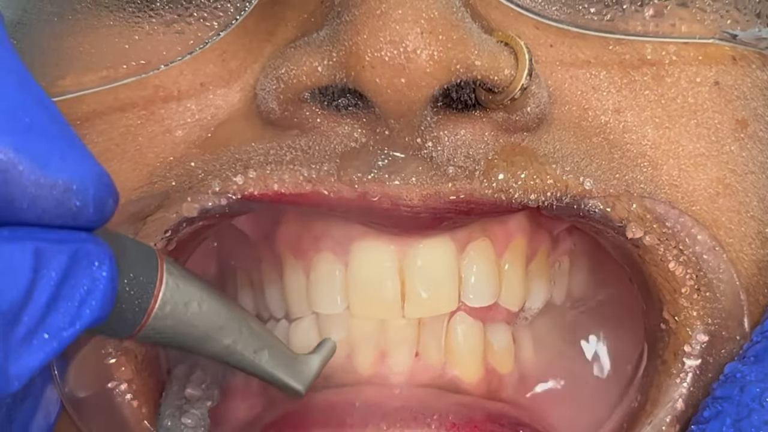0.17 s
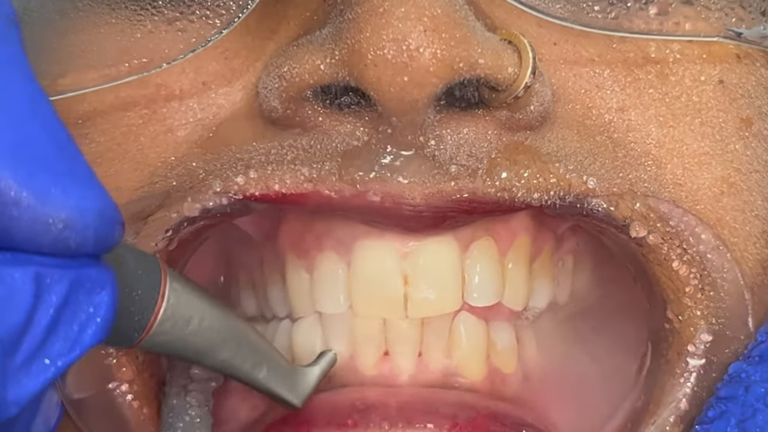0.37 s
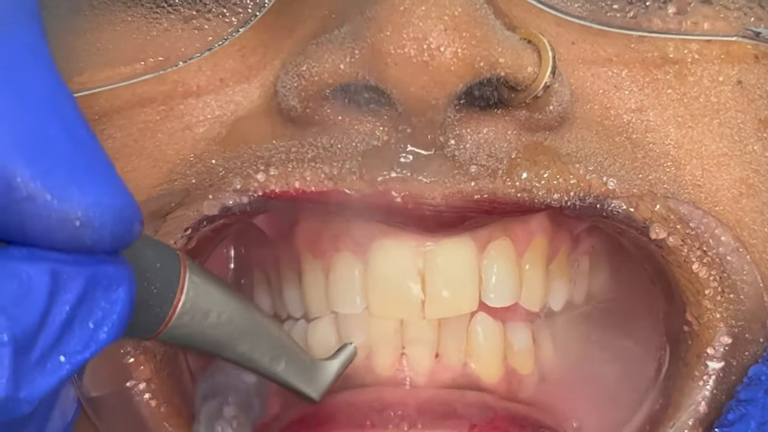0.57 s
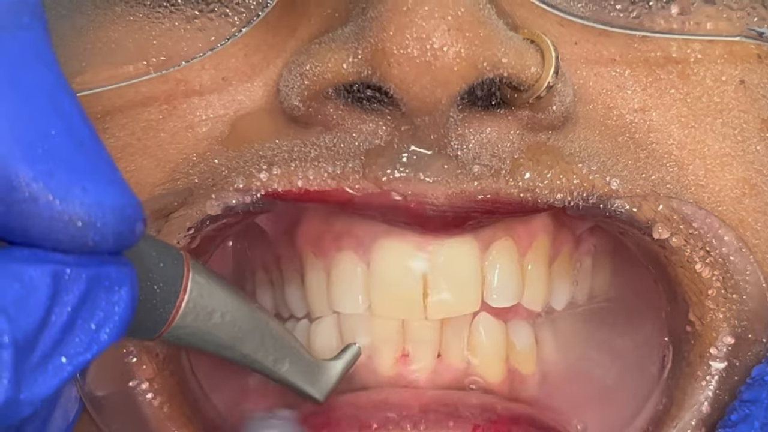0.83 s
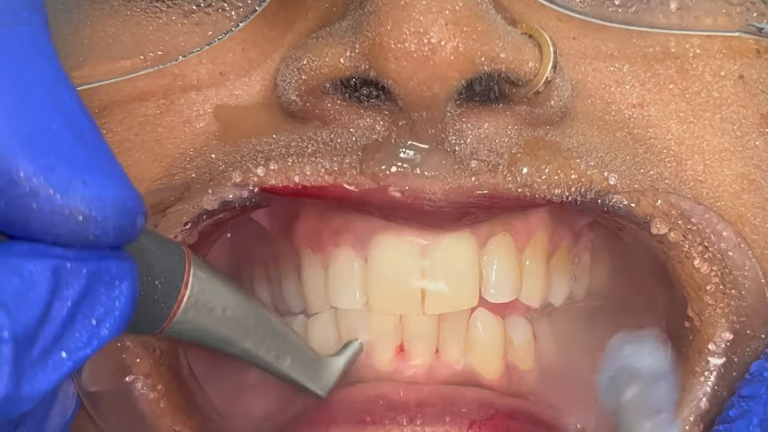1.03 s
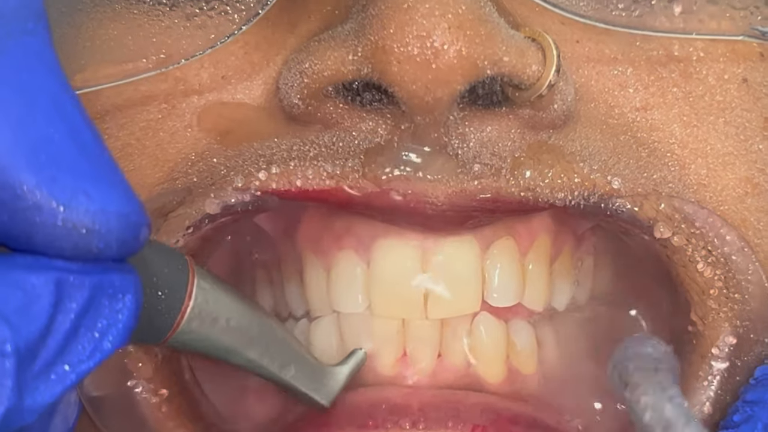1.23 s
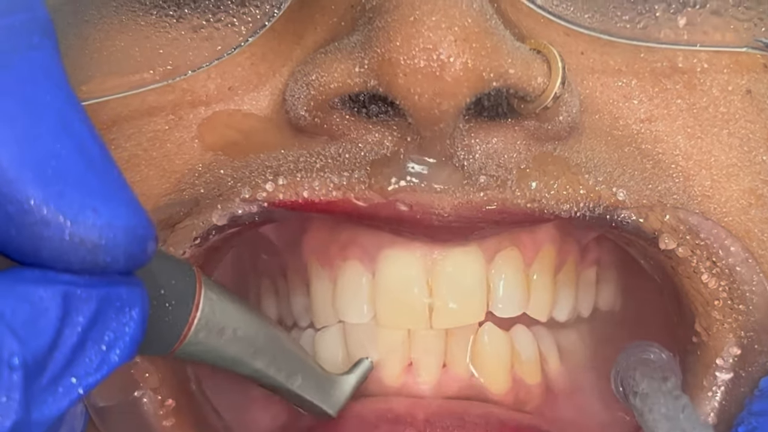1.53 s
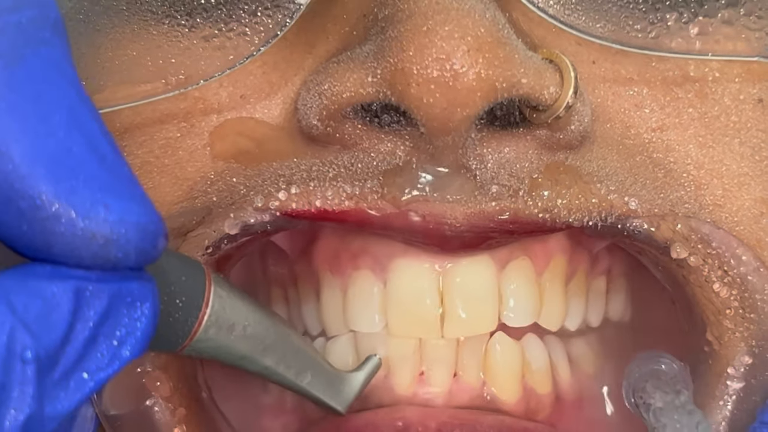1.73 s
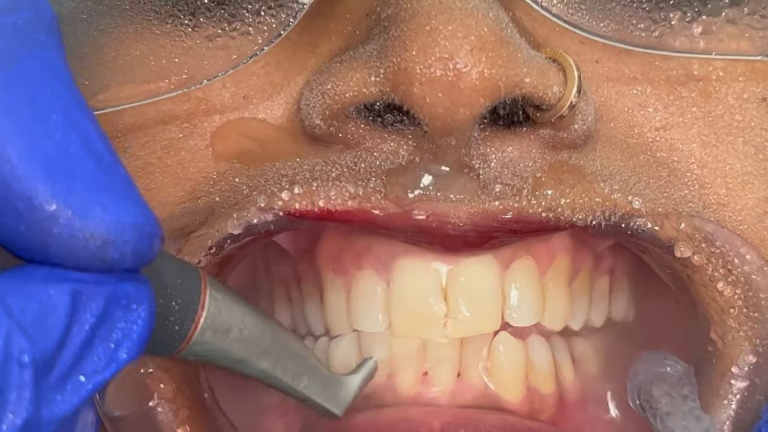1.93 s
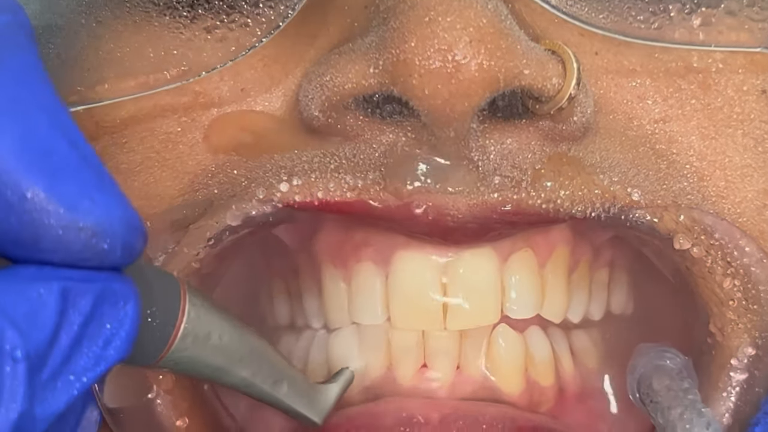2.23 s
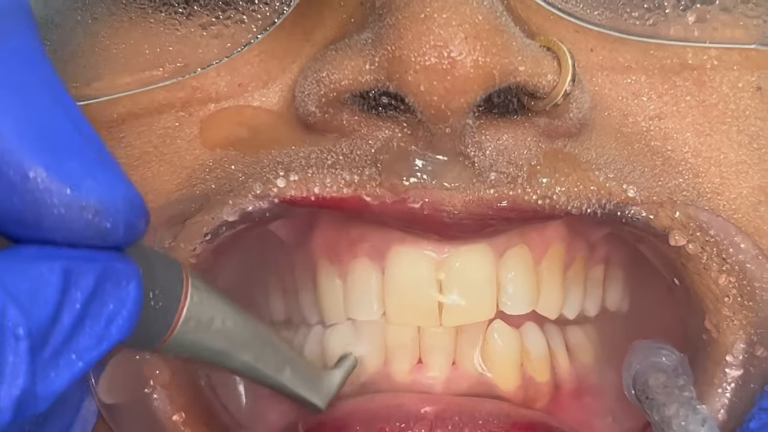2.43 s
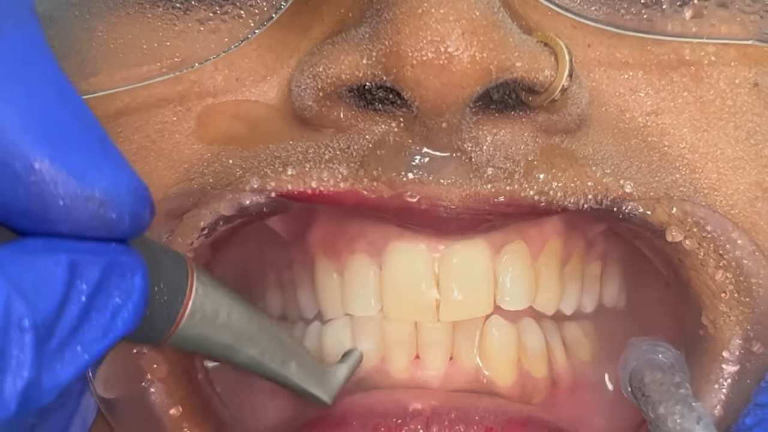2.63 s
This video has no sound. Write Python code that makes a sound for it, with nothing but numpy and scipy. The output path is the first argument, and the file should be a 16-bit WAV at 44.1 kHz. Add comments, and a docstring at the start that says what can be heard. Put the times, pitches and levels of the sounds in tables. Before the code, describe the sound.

A dental polishing jet hisses high and sharp on teeth throughout, fluttering in strength, with a faint whistle. A suction tip rushes and slurps early and again near the end, close in stereo in a quiet room.

```python
"""Dental polishing jet and suction tip

Place: a mouth in a quiet room, heard through two microphone ports, jet and tip in front of the room.
The jet of air, water and powder hisses on the teeth, swelling as it crosses gaps: coloured noise with
fine ticks and tonal bands. The suction tip draws air and slurps water: noise and bursts through resonances.
Behind are noise rushing in the hose, the room's low rumble and a pump hum of narrow noise bands."""
import sys
import numpy as np
from scipy import signal
from scipy.fft import rfft, irfft
from scipy.io import wavfile
from scipy.ndimage import uniform_filter1d

SR = 44100
rng = np.random.default_rng(int(sys.argv[2]) if len(sys.argv) > 2 else 0)


def transcribe(u):
    """Save the signal u as a 16-bit wav file named by the first command-line argument.

    u: samples, shape (n,) or (channels, n), limited to [-1, 1]; the rate is SR.
    q: integer samples, one column per channel.
    """
    v = np.clip(np.atleast_2d(u).T, -1, 1)
    q = np.round(v * 32767).astype(np.int16)
    wavfile.write(sys.argv[1], SR, q)


N = 123480   # length in samples

# jet on the teeth: time_s, hiss_level_db, treble_level_db
JET_LEVELS = [(0.0, -26, -39), (0.04, -34, -35), (0.14, -27, -37), (0.26, -26.5, -26), (0.33, -26.5, -28),
              (0.38, -33, -36), (0.51, -25.5, -34), (0.69, -30, -33.5), (0.89, -28, -32),
              (0.98, -34.5, -35.5), (1.08, -26.5, -30.5), (1.25, -36.5, -36.5), (1.35, -28.5, -30),
              (1.58, -25, -31.5), (1.64, -21, -32), (1.71, -21.5, -25), (1.75, -24, -25), (1.87, -33, -29),
              (1.93, -25, -23.5), (1.99, -24, -27), (2.03, -29.5, -31), (2.07, -23.5, -24.5),
              (2.1, -25.5, -31), (2.18, -29, -24), (2.21, -29, -30.5), (2.26, -27.5, -25.5),
              (2.28, -32, -32.5), (2.36, -36.5, -31.5), (2.4, -27, -26), (2.51, -40.5, -33.5),
              (2.61, -27, -27), (2.69, -37, -32), (2.71, -32.5, -38), (2.77, -26.5, -26), (2.8, -39, -23)]
# colour of the main hiss: freq_hz, relative_density_db
JET_BODY_COLOUR = [(4500, -33), (5500, -17.5), (6500, -8.5), (7300, -3.5), (7900, 0), (8700, -2),
                   (9400, -6.5), (10300, -22), (11500, -61)]
# colour of the treble: freq_hz, relative_density_db
JET_TREBLE_COLOUR = [(9500, -6), (10500, -12), (11600, -5.5), (12100, -4.5), (13000, -4), (13900, -2.5),
                     (14600, 1.5), (16500, -17)]
# droplets and powder ticking on enamel: rate, and share of the jet's power
SPATTER_PER_S, SPATTER_SHARE = 2500, 0.1
# the nozzle's faint whistle: pitch_hz, width_hz, relative_level_db
WHISTLE_PEAKS = [(7890, 160, -3.5)]
# whistle and gap tone: dB against the main hiss, extra dB per dB of hiss about its mean
TONES_DB, TONES_GROW = -9, 0.82
# resonance of the gap between nozzle and teeth: time_s, pitch_hz
GAP_PITCH = [(.5, 7400), (1.3, 7450), (1.52, 7050), (1.66, 7450), (1.78, 7150), (1.96, 7500)]
GAP_WIDTH_HZ = 820

# air drawn into the tip: time_s, low_drive_db, middle_drive_db, high_drive_db
SUCTION_LEVELS = [(0, -39, -33, -60), (.08, -39, -38.5, -56), (.15, -33.5, -32, -46),
                  (.28, -39, -37.5, -45), (.33, -44, -48, -47), (.45, -48, -45, -43),
                  (.47, -38, -36.5, -47), (.58, -42.5, -41, -48), (.65, -39.5, -36.5, -49),
                  (.79, -42, -39.5, -51), (.86, -47, -46, -47), (1.1, -46, -43, -45.5),
                  (1.4, -44.5, -44, -46), (1.53, -44, -40, -37), (1.62, -43.5, -40, -37),
                  (1.85, -42.5, -44.5, -45), (2.0, -40, -40.5, -42), (2.25, -45, -39.5, -46.5),
                  (2.4, -45.5, -39, -38.5), (2.5, -49, -41.5, -43.5), (2.6, -47, -37, -39),
                  (2.69, -54, -41.5, -49), (2.8, -42.5, -35, -40)]
# resonances of the tip in low, middle and high groups: pitch_hz, width_hz, relative_level_db
TIP_RESONANCES = [
    [(3283, 590, 0)],
    [(3653, 530, -0.5), (3920, 1040, -2)],
    [(4647, 560, 1), (5100, 4900, -4)],
]
# the tip's lowest resonance: pitch_hz, width_hz, relative_level_db
LOWEST_RESONANCE = (2630, 456, -5)
# extra level of that lowest resonance: time_s, gain_db
LOWEST_GAIN = [(.3, 0), (.47, 3), (.8, 7.5), (1.3, -3.5), (2.1, -7), (2.4, 2.5)]
# rush in the hose: time_s, low_part_db, high_part_db
HOSE_LEVELS = [(0.0, -51, -56.5), (0.2, -48, -49.5), (0.4, -51, -56.5), (0.62, -46, -53),
               (0.93, -50.5, -56), (1.58, -53, -51.5), (2.15, -51, -52.5), (2.67, -48, -52),
               (2.8, -49.5, -49)]
# colour of the low part of the rush: freq_hz, relative_density_db
HOSE_LOW_COLOUR = [(260, -39), (450, -8), (536, -18.5), (579, -9.5), (985, -1), (1400, -5), (1820, -22)]
# colour of the high part of the rush: freq_hz, relative_density_db
HOSE_HIGH_COLOUR = [(1200, -29), (1450, -15.5), (1800, -1), (2300, 6), (2800, -7)]

# colour of the room's rumble: freq_hz, relative_density_db
RUMBLE_COLOUR = [(25, -79), (64, -6.5), (194, -7), (230, -7), (289, 2.5), (321, -6), (352, -6.5),
                 (492, -16.5), (600, -16), (780, -22)]
RUMBLE_DB = -44
# pump hum: pitch_hz, width_hz, level_db
HUM_BANDS = [(77, 12, -67), (169.1, 11.6, -62), (243.2, 27, -49.5), (294.7, 11.7, -49.5), (354.6, 21, -54),
             (390, 11.6, -61.5)]

# slurps of water in the tip: start_s, level_db (before the crest allowance and the tip), length_s
SLURP_EVENTS = [(0.158, -24, 0.006), (0.258, -13.5, 0.0056), (0.4652, -8.5, 0.0043), (0.4737, -7, 0.0073),
                (0.494, -10, 0.0045), (0.54, -15, 0.016), (0.51, -26, 0.0049), (0.633, -15.5, 0.014),
                (1.5993, -17, 0.006), (2.583, -30, 0.0072), (2.2997, -12.5, 0.004), (2.35, -17, 0.0079),
                (2.366, -9.5, 0.0064), (2.393, -12.5, 0.0053), (2.433, -14, 0.0065), (2.451, -10.5, 0.0095),
                (2.466, -11.5, 0.0059), (2.495, -18.5, 0.006), (2.521, -17, 0.0089), (2.5325, -15, 0.0041),
                (2.551, -15, 0.0055), (2.562, -13.5, 0.0058), (2.604, -10.5, 0.0043), (2.624, -19, 0.01),
                (2.645, -16, 0.0074), (2.667, -18.5, 0.0054), (2.7056, -18.5, 0.0058), (2.713, -16, 0.006),
                (2.75, -14, 0.0055)]
SLURP_CREST_DB = 8   # allowance for the peaks of the noise

# the pump's second partial comes and goes: time_s, level_db (before a 6 dB lift)
OVERTONE_LEVELS = [(.45, -61), (.52, -79), (1.05, -59.5), (1.25, -80)]
OVERTONE_HZ = 591
# one short swell of the lows: centre s, half-width s (to 1/e in dB), height dB
SWELL_S, SWELL_WIDTH_S, SWELL_DB = 1.335, 0.032, 6

# between the ports, lower range: freq_hz, left_lead_rad
LEFT_LEAD_LOW = [(300, -0.00061), (600, -1.05), (1200, -0.093), (1500, -1.25), (2070, 1.34), (2670, 0.71),
                 (3010, 1.94), (3530, 0.37)]
# between the ports, upper range: freq_hz, left_lead_rad
LEFT_LEAD_HIGH = [(4100, 0), (7500, 0), (8200, 2.1), (9100, 1.9), (10200, np.pi), (11650, np.pi),
                  (12000, 4.8), (13150, 2 * np.pi)]
# share unlike in the two ports: freq_hz, level_db
SCATTERED_SHARE = [(60, -18), (260, -20), (400, -9), (800, -8.5), (2000, -5.5), (3400, -3), (4200, -30),
                   (5200, -72), (7600, -54), (8200, -21.5), (10000, -5), (10350, -47), (11450, -61),
                   (11900, -5.5), (12900, -13), (13300, -48)]
# level between the ports: freq_hz, left_minus_right_db
PORT_TILT = [(300, 0), (400, 3.5), (600, -2.5), (1300, -2), (2400, -3), (3400, 4.5)]
CUTOFF_HZ = 15950


def amp(db):
    """Amplitude factor of a level in dB."""
    return 10 ** (np.asarray(db) / 20)


def rms_one(x):
    """Scale to an rms of 1."""
    return x / np.sqrt(np.mean(x ** 2) + 1e-20)


def in_time(rows):
    """Columns of a table over time as curves over the samples."""
    s, *columns = np.transpose(rows)
    return [np.interp(np.arange(N) / SR, s, column) for column in columns]


def at_hz(points, ends=None):
    """A table over frequency, read at every spectral line on a log scale."""
    hz, values = np.transpose(points)
    line_hz = np.arange(N // 2 + 1) * SR / N
    return np.interp(np.log(line_hz + 1), np.log(hz + 1), values, ends, ends)


def drift(rate):
    """Chance that wavers at about this rate in Hz, slower swings taken out; spread about 1."""
    r = np.exp(-20 * np.pi * rate / SR)   # drawn at a tenth of the sample rate
    noise = rng.standard_normal(N // 10 + 3002)
    slow = signal.lfilter([1], [1, -2 * r, r * r], noise)[3000:]   # drop the filter's run-in
    slow = slow - uniform_filter1d(slow, size=int(.4 * SR / rate))
    return np.interp(np.arange(N) / 10, np.arange(len(slow)), rms_one(slow))


def air(slow_db, fast_db, shared=0):
    """Turbulence: two unrelated noise draws that flicker together."""
    flicker_db = slow_db * drift(6.0) + fast_db * drift(158) + shared
    return rng.standard_normal((2, N)) * amp(flicker_db)


def coloured(x, spectrum):
    """Give a sound a spectrum, at an rms of 1."""
    return rms_one(irfft(rfft(x) * amp(at_hz(spectrum, -120)), N))


def resonate(x, peaks):
    """Parallel resonances, each passed twice; white noise of rms 1 comes out at each one's level."""
    out = 0
    impulse = np.eye(1, SR)[0] + 1e-18
    for k, (hz, width, db) in enumerate(peaks):
        r = np.exp(-np.pi * width / SR)
        row = [1, 0, -1, 1, -2 * r * np.cos(2 * np.pi * hz / SR), r * r]
        energy = np.sum(signal.sosfilt([row, row], impulse) ** 2)
        # neighbours alternate in sign
        out = out + (-1) ** k * amp(db) * signal.sosfilt([row, row], x) / np.sqrt(energy)
    return out


def jet():
    """Bright turbulence with spatter in it, and tonal bands that grow with the main hiss."""
    body_db, treble_db = in_time(JET_LEVELS)
    gusts_db = 0.47 * drift(6.2) + 1.0 * drift(25.6)
    ticks = spatter(gusts_db)
    body, treble = [np.sqrt(1 - SPATTER_SHARE) * rms_one(air(0.16, 0.19, gusts_db))
                    + np.sqrt(SPATTER_SHARE) * ticks for _ in range(2)]
    tones_gain = amp(TONES_DB + TONES_GROW * (body_db - body_db.mean()))
    tones = tones_gain * (whistle(gusts_db) + gap_tone(gusts_db))
    hiss = amp(body_db) * (coloured(body, JET_BODY_COLOUR) + tones)
    return hiss + amp(treble_db) * coloured(treble, JET_TREBLE_COLOUR)


def spatter(gusts_db):
    """Droplets and powder tick on enamel: sparse single-sample impulses of random strength."""
    hits = rng.random((2, N)) < SPATTER_PER_S / SR
    return rms_one(hits * rng.standard_normal((2, N))) * amp(gusts_db)


def whistle(gusts_db):
    """The nozzle whistles faintly: turbulence through a narrow resonance."""
    return resonate(rms_one(air(1.3, 0.72, gusts_db)), WHISTLE_PEAKS)


def gap_tone(gusts_db):
    """A band of noise on a carrier whose pitch slides as the nozzle moves."""
    phase = 2 * np.pi * np.cumsum(in_time(GAP_PITCH)[0]) / SR
    low = signal.butter(2, GAP_WIDTH_HZ / 2, fs=SR, output="sos")
    a, b = (signal.sosfilt(low, air(3.0, 0.66, gusts_db)) for _ in range(2))
    return rms_one(a * np.cos(phase) + b * np.sin(phase))


def suction():
    """Tip and hose share one gurgle in their flow of air."""
    gurgle_db = 1.9 * drift(55)
    return suction_tip(gurgle_db) + hose_rush(gurgle_db)


def suction_tip(gurgle_db):
    """Gurgling air and short sputtering slurps excite the tip's resonances."""
    levels = amp(in_time(SUCTION_LEVELS))
    shares = levels / np.sqrt(np.sum(levels ** 2, axis=0))   # slurps split as the air does
    lowest_gain = amp(in_time(LOWEST_GAIN)[0])
    slurp = slurps()
    out = 0
    for k, (level, share, peaks) in enumerate(zip(levels, shares, TIP_RESONANCES)):
        drive = level * rms_one(air(1.0, 0.35, gurgle_db)) + share * slurp
        out = out + resonate(drive, peaks)
        if k == 0:   # the lowest resonance joins the low group with opposite sign
            out = out - lowest_gain * resonate(drive, [LOWEST_RESONANCE])
    return out


def hose_rush(gurgle_db):
    """Turbulence rushes in the hose, coloured into a low and a high part."""
    low_db, high_db = in_time(HOSE_LEVELS)
    rush = air(0.86, 2.0, .5 * gurgle_db)
    low = amp(low_db + .5 * swell_db()) * coloured(rush, HOSE_LOW_COLOUR)
    return low + amp(high_db) * coloured(rush, HOSE_HIGH_COLOUR)


def room():
    """Rumble and hum swell together once; the pump's overtone stays apart from that."""
    return amp(swell_db()) * (rumble() + pump_hum()) + pump_overtone()


def rumble():
    """Low rumble of the room: softly flickering coloured noise."""
    return amp(RUMBLE_DB) * coloured(air(0.86, 0.077), RUMBLE_COLOUR)


def pump_hum():
    """The pump's wavering hum: noise through narrow resonances."""
    return resonate(rng.standard_normal((2, N)), HUM_BANDS)


def slurps():
    """Water sputters in the tip: noise under short envelopes that rise fast and die away."""
    t, bursts = np.arange(N) / SR, np.zeros(N)
    sputter = rng.standard_normal((2, N)) * amp(0.6 * drift(250))
    for start, db, length in SLURP_EVENTS:
        age = np.maximum(t - start, 0) / max(length, .001)   # in lengths of the slurp
        bursts += amp(db - SLURP_CREST_DB) * age ** 0.93 * np.exp(1.3 - 3.5 * age)
    return bursts * sputter


def pump_overtone():
    """The pump's second partial: a sine with wandering phase, in the direct draw only."""
    phase = 2 * np.pi * OVERTONE_HZ * np.arange(N) / SR + drift(7.8)
    return amp(in_time(OVERTONE_LEVELS)[0] + 6) * np.sin(phase) * [[1], [0]]


def swell_db():
    """One short soft swell of the lows, bell-shaped in dB."""
    return SWELL_DB * np.exp(-((np.arange(N) / SR - SWELL_S) / SWELL_WIDTH_S) ** 2)


def ports(pair):
    """The first draw reaches both microphone ports with a phase step, the second is unlike in the two."""
    direct, scattered = rfft(pair)
    side = np.array([[1], [-1]])   # left, right
    turn = np.exp(.5j * at_hz(LEFT_LEAD_LOW + LEFT_LEAD_HIGH))   # half the lead on each side
    # opposite signs in the ports, but like signs where the turn is mostly imaginary
    unlike = np.where(abs(turn.imag) > abs(turn.real), 1, side)
    both = direct * turn ** side + scattered * amp(at_hz(SCATTERED_SHARE)) * unlike
    tilt_db = at_hz(PORT_TILT + [(4100, 0)])   # level ports from 4100 Hz up
    return irfft(both * amp(.5 * side * tilt_db), N)


def scene():
    """All sources at the two ports."""
    return ports(jet() + suction() + room())


def record(dry):
    """The microphone signal loses its rumble below 45 Hz and is cut steeply at the top."""
    dry = signal.sosfilt(signal.butter(2, 45, "high", fs=SR, output="sos"), dry)
    return signal.sosfilt(signal.cheby2(30, 60, CUTOFF_HZ, fs=SR, output="sos"), dry)


dry = scene()
out = record(dry)
transcribe(out)
```